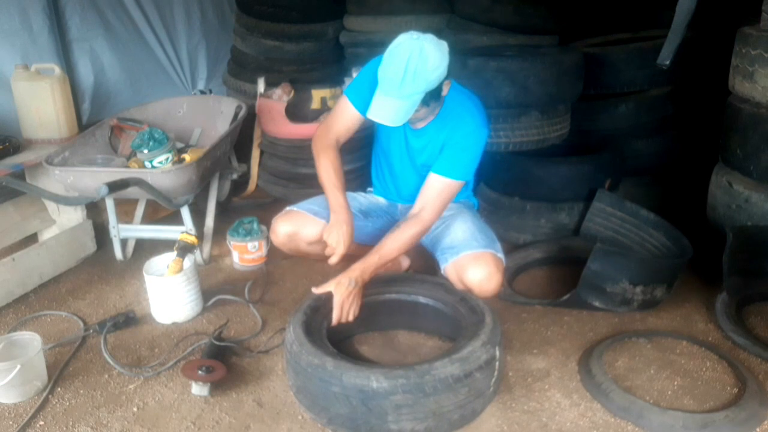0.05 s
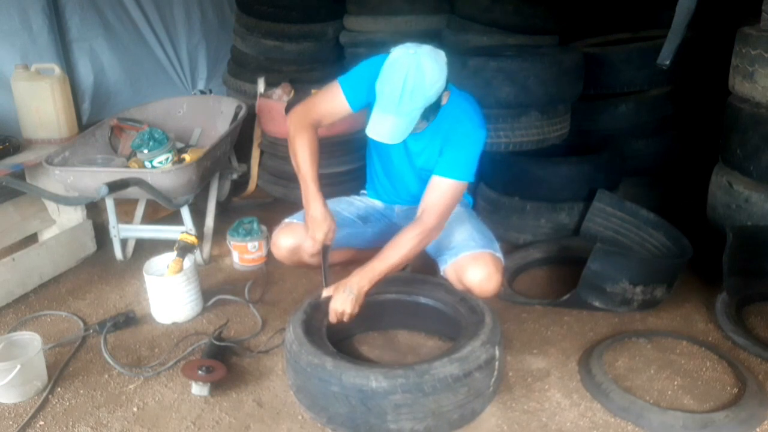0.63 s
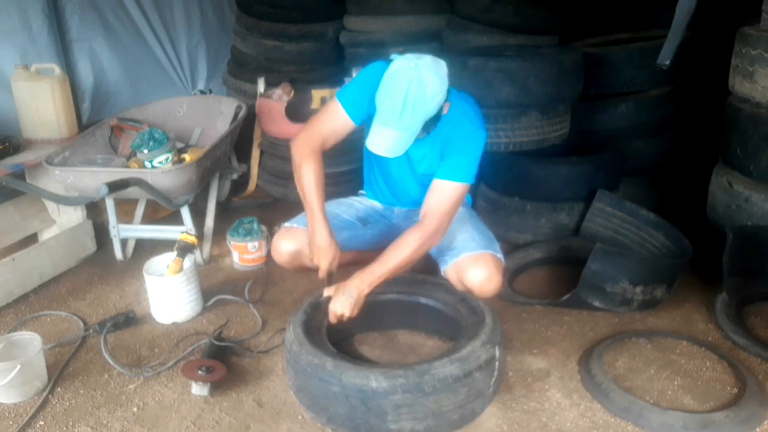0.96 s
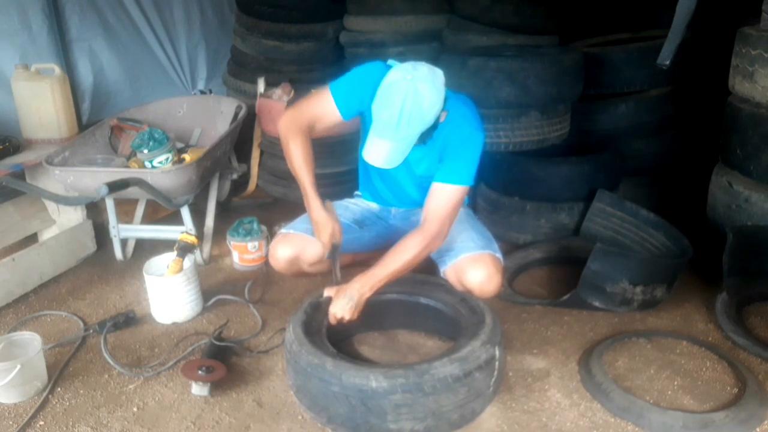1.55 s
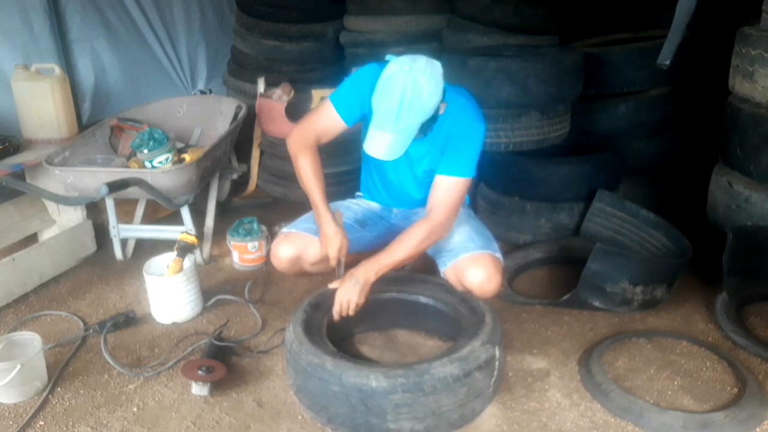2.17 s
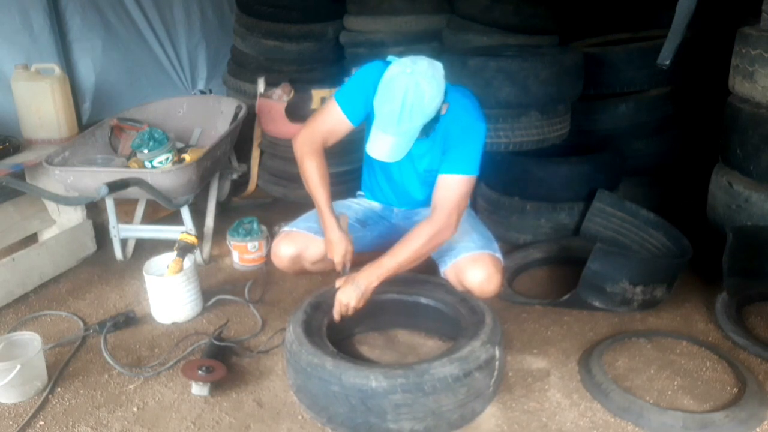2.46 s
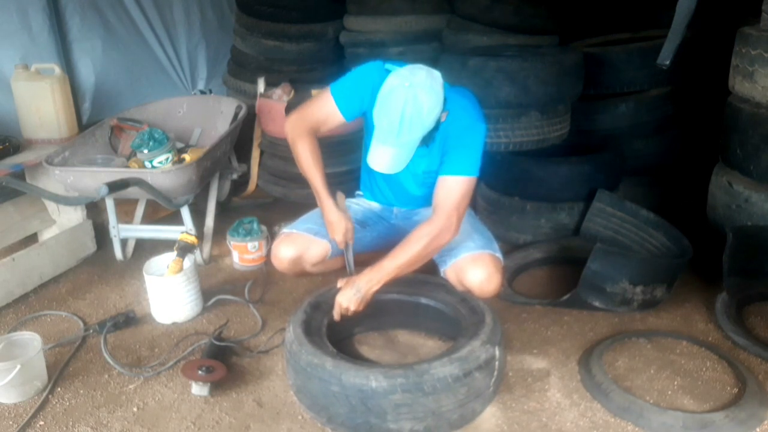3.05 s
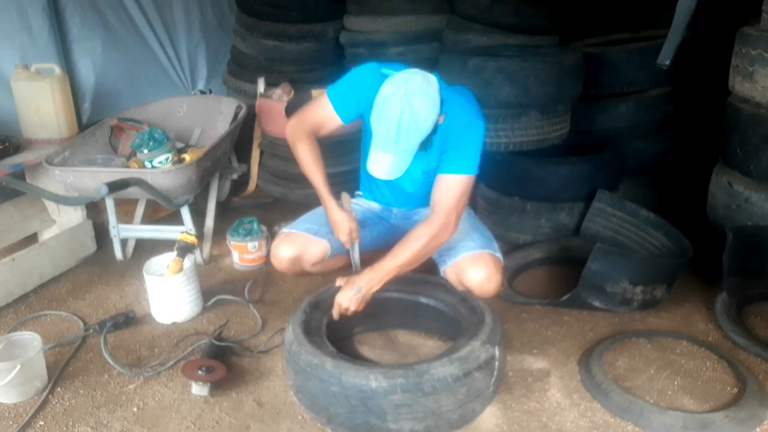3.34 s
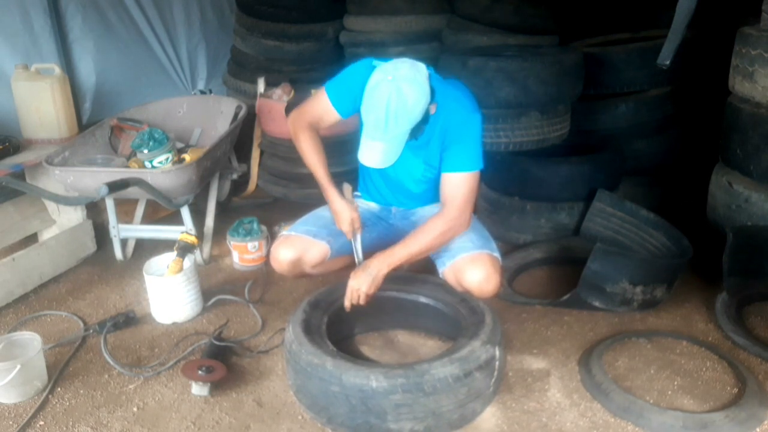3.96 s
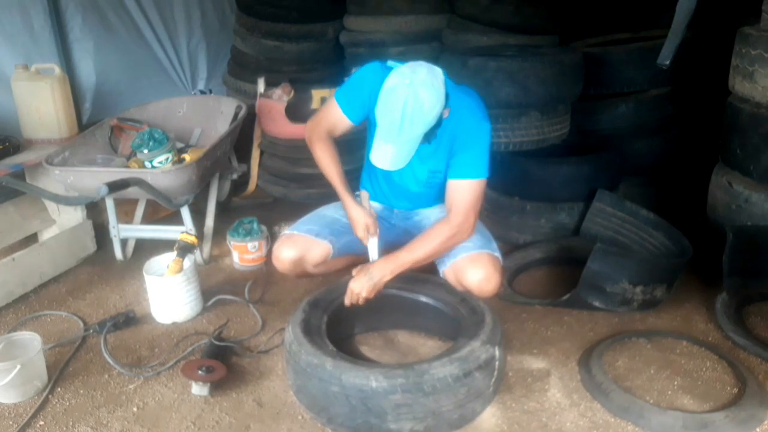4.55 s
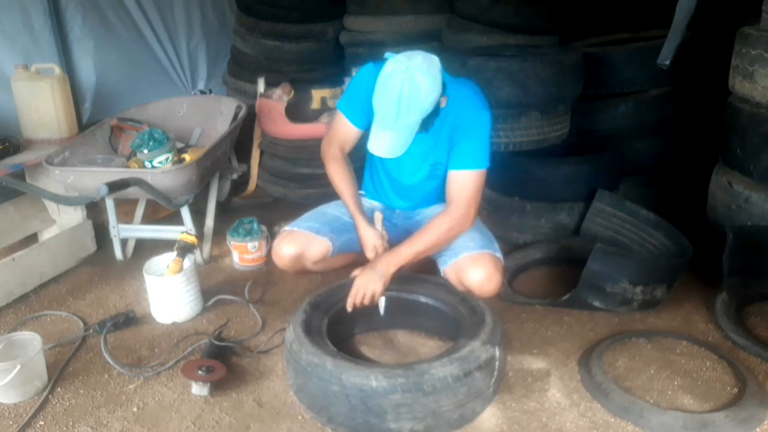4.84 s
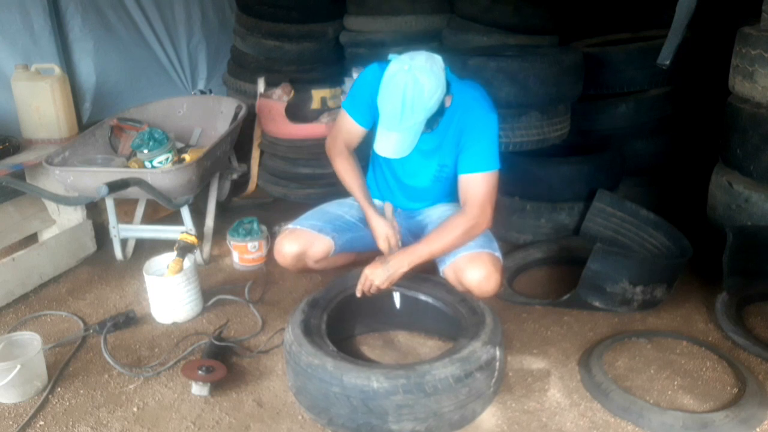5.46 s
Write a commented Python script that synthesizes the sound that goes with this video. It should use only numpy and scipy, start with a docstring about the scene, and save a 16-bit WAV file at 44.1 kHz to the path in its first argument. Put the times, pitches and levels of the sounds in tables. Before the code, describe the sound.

A knife saws through the thick rubber of a car tyre in short, uneven strokes, several a second. Each stroke mixes a hollow drumming from the tyre with a gritty rasp and a tearing hiss. The blade squeaks briefly, ticks, whistles thinly and now and then snags with a dull knock. The sawing pauses briefly a few times and resumes. It is heard from a few metres away in a shed, over a faint low rumble.

```python
"""Sawing a tyre with a knife

A man saws the sidewall out of a car tyre with a long knife, in a shed, a few metres away.
On each stroke the rubber sticks and slips on the edge: the slips drum the carcass, rasp along the
blade and tear with a hiss. Where the stroke turns, the flat of the blade squeaks in the cut.
The steel also ticks, snags and whistles thinly, over a faint low rumble."""
import sys
import numpy as np
from scipy import signal
from scipy.fft import rfft, irfft, next_fast_len
from scipy.io import wavfile
from scipy.ndimage import uniform_filter1d, map_coordinates

SR = 44100
rng = np.random.default_rng(int(sys.argv[2]) if len(sys.argv) > 2 else 0)


def wav_record(signal):
    """Record a signal, one row per channel, as 16-bit PCM in the file named by sys.argv[1]."""
    frames = np.transpose(np.atleast_2d(signal))
    bounded = np.clip(frames, -1, 1)
    # unit amplitude maps onto the largest positive 16-bit level
    quanta = np.round(bounded * 32767).astype(np.int16)
    wavfile.write(sys.argv[1], SR, quanta)


N = 251811
TIME = np.arange(N) / SR
FFT_SIZE = next_fast_len(N + SR // 2, True)
FREQ = np.fft.rfftfreq(FFT_SIZE, 1 / SR)
TOP_HZ = 15480

# modes of the tyre carcass and its air ring: pitch_hz, width_hz, gain_db
TYRE_MODES = [(117, 11.4, -8), (154, 18, -2), (189.5, 19, -1), (208, 15.6, 4.5), (225, 29, -3.5),
              (284, 33, -3.5), (427.7, 27, 6), (454, 44, 1.5), (490.5, 30, -1.5), (616, 19.5, 1.5),
              (649.3, 13.3, -1.5), (763, 17.5, -3), (846, 17.5, -3), (892, 28, -2), (1027, 31, 0),
              (1077, 50, -2), (1112.5, 20, 0), (1185, 15.2, 6), (1247, 9.8, 1), (1322, 24, -5.5),
              (1494, 18, -9.5)]
# bending modes of the blade: pitch_hz, width_hz, gain_db
BLADE_MODES = [(2098, 47, 6.5), (2506, 90, 8.5), (2707, 200, 0), (3020, 200, 11.5), (3930, 390, -1),
               (4520, 67, 5.5)]
# spectra of the rubber, the rasp, the tearing and the air in the shed: frequency_hz, gain_db
RUBBER_SPECTRUM = [(50, -16), (110, -19.5), (200, 9), (350, -18), (600, 2), (1200, -9), (1600, -7),
                   (2400, -13)]
RASP_SPECTRUM = [(1100, -19), (1600, -3.5), (2200, -1.5), (3000, 2), (3700, -1.5), (4350, 6.5), (4950, 0.5),
                 (5550, 3), (6300, -8.5), (7500, -10)]
HISS_SPECTRUM = [(5200, -29), (6400, -9), (6950, -7.5), (7550, -9.5), (8100, -2), (8550, -1.5),
                 (9300, -7.5), (10500, -7), (11850, -2), (12800, -3.5), (14000, 0.5), (14600, -3.5),
                 (15300, 3.5), (16500, -28)]
AIR_SPECTRUM = [(20, -9), (32, -6), (45, -4.5), (75, 0.5), (120, 2.5), (200, -10), (300, -10), (1000, -17),
                (3000, -23.5), (4400, -16), (6300, -19), (7200, -16), (10500, -30), (15300, -22)]
# strokes, mostly a hard cut and a lighter return; the last three levels are relative to the carcass:
# start_s, length_s, carcass_db, swell_db, boom_db, rasp_db, hiss_db
ARM_STROKES = [(-0.02, 0.076, -50.5, -20, 0, 1.5, -2), (.225, 0.075, -77, -4, 14.5, 12.5, -2),
               (0.395, .07, -61, 5.5, -0.5, 0.5, -6), (0.5, 0.24, -71.5, 6, -5, 4, -3),
               (0.682, 0.17, -54, 11.5, -10.5, -6.5, -2.5), (0.861, 0.097, -45.5, 6.5, -0.5, -6, 0),
               (1.022, 0.091, -49.5, 3.5, 1, -5, -4), (1.109, 0.082, -56.5, 3, -5, -3, -0.5),
               (1.267, 0.16, -44.5, 7.5, -4, -11, -2.5), (1.512, 0.14, -49, -7.5, 4, -5.5, -5),
               (1.726, 0.13, -46, 3.5, -1, -10.5, 3), (1.883, 0.058, -48, 3, -1, -11, -30),
               (2.196, .17, -56.5, 0.5, -9, -13.5, -4), (2.411, .135, -48, 7, -4.5, -4, -10.5),
               (2.582, 0.14, -54.5, -4, 3, 1.5, -4.5), (2.756, 0.12, -47.5, 0, -9, -7, -10),
               (2.934, 0.13, -58.5, 5, -4.5, 2.5, 0.5), (3.1, 0.14, -43.5, 7.5, -8.5, -8.5, -6.5),
               (3.29, 0.096, -47.5, -4, -4, -3, -8.5), (3.451, 0.09, -44, 4, -8, -6.5, -2.5),
               (3.81, 0.2, -59.5, 4.5, -19.5, -13.5, -8), (4.02, 0.17, -48, 8.5, -12, -3.5, -10.5),
               (4.22, 0.12, -53, -3, 0, -1, -4.5), (4.373, .104, -47.5, 10, -8.5, -3.5, -9),
               (4.509, 0.1, -52, -2.5, -1.5, -4, -5.5), (4.648, .11, -44, 9.5, -3, -4.5, -8.5),
               (5.054, .135, -66.5, 6, -2, 1, 2.5), (5.209, .123, -43, 4.5, 0, -0.5, -10),
               (5.369, 0.079, -50.5, 0, -1.5, -1, -4.5), (5.49, 0.09, -44, 6.5, -3, -1, -10),
               (5.622, 0.068, -51.5, -2, -5, 1.5, -4)]
# ring of the blade within the rasp, damped when buried and freer as it sticks out: time_s, gain_db
BLADE_RINGING = [(0, 8.5), (.95, -15), (1.85, -10), (2.55, -3), (3.3, -4.5), (5.3, 5), (5.7, 3)]
# treble of the tearing hiss: time_s, gain_db
HISS_TREBLE = [(0, -8), (.6, -11), (.95, -8.5), (1.4, -9.5), (1.85, 0), (2.15, -30), (2.55, -4), (3.2, -2),
               (3.55, -13), (4.75, -7), (5.7, -10)]
# swell of the low rumble, strongest as the tyre rocks: time_s, gain_db
RUMBLE_SWELL = [(0, 0), (2.3, 0), (3.9, 0.5), (4.7, 2), (4.95, 5.5), (5.2, 3), (5.7, 5)]
# squeaks of the blade in the cut: start_s, length_s, first_hz, last_hz, level_db
BLADE_SQUEAKS = [(.011, 0.055, 2634, 1734, -59), (0.468, 0.018, 9200, 7720, -53.5),
                 (0.736, 0.043, 6200, 8500, -55), (0.819, 0.1, 10600, 11800, -61),
                 (1.129, 0.05, 13900, 15600, -40.5), (1.145, 0.028, 12100, 13000, -43.5),
                 (1.279, .019, 5600, 5300, -53), (1.288, .013, 8700, 8350, -41.5),
                 (1.31, 0.0444, 7200, 7740, -54), (1.439, 0.023, 4100, 3530, -52),
                 (1.738, 0.016, 4270, 4750, -52), (1.864, 0.019, 4280, 3720, -51.5),
                 (2.236, 0.023, 15200, 14600, -57), (2.36, .018, 14800, 13400, -55),
                 (3.018, 0.026, 14300, 8930, -43), (3.032, 0.017, 9000, 6410, -37),
                 (3.036, .02, 14600, 13700, -41), (3.039, .016, 6850, 8240, -41),
                 (3.057, 0.017, 5520, 2030, -48), (3.125, .04, 11100, 14300, -52),
                 (3.472, .013, 6300, 5900, -51), (3.547, 0.032, 5540, 3730, -50),
                 (3.562, 0.015, 2895, 2230, -51.5), (4, 0.015, 13600, 6900, -52),
                 (4.007, 0.0101, 4240, 5540, -45.5), (5.161, 0.013, 14860, 12570, -42)]
# the steel touches or frees itself: start_s, strength_db
STEEL_TICKS = [(0.015, -49), (.238, -50.5), (0.435, -62), (.561, -55), (.639, -54), (.699, -48.5),
               (1.528, -43), (1.892, -39.5), (1.968, -45), (2.596, -54), (2.785, -46), (5.164, -44.5),
               (5.646, -39.5)]
# the edge snags and lets go: start_s, peak_db, cutoff_hz
EDGE_SNAGS = [(0.049, -47, 199), (.291, -55.5, 150), (0.406, -46, 890), (.888, -32, 890), (1.412, -38, 400),
              (1.528, -37.5, 706), (1.565, -38, 198), (1.77, -35.5, 494), (2.786, -47, 900),
              (3.835, -49.5, 400), (4.049, -34.5, 1810), (4.724, -42, 304), (4.853, -51.5, 250),
              (5.321, -33, 300), (5.646, -40.5, 700)]
# the blade is eased along the slit:
# start_s, length_s, first_hz, last_hz, glide_exponent, level_db, swell_db
SLIT_WHISTLES = [(1.061, 0.29, 5550, 5630, 1.47, -62, -17), (1.07, 0.25, 4330, 4310, 1.35, -68, 9),
                 (2.04, 0.3, 8410, 6500, 2.5, -69, 14), (2.021, 0.46, 3050, 4160, 0.54, -72.5, 15),
                 (2.188, 0.26, 5160, 5700, 0.66, -67, 4), (3.873, 0.56, 3990, 4100, 1.05, -63.5, 3)]


def undb(db):
    """Amplitude ratio of a level in decibels."""
    return 10 ** (np.asarray(db) / 20)


def unit(x):
    """Normalisation to rms 1."""
    return x / np.sqrt(np.mean(x ** 2))


def curve(points):
    """Linear interpolation of (time_s, value) points."""
    return np.interp(TIME, *np.transpose(points))


def through(x, response):
    """Linear filtering: the spectrum is multiplied by a frequency response."""
    return irfft(rfft(x, FFT_SIZE) * response, FFT_SIZE)[:N]


def colour(points, skirt_db_per_octave=24):
    """Spectral envelope through (frequency_hz, gain_db) points, falling steeply outside them."""
    hz, db = np.transpose(points)
    octave, knots = np.log2(FREQ + 1), np.log2(hz)
    outside = np.abs(octave - np.clip(octave, knots[0], knots[-1]))
    return undb(np.interp(octave, knots, db) - skirt_db_per_octave * outside)


def modes(table):
    """Modal superposition: damped resonances add, with neighbours in opposite polarity."""
    return sum((-1) ** k * undb(db) * 1j * FREQ * width / (hz ** 2 - FREQ ** 2 + 1j * FREQ * width)
               for k, (hz, width, db) in enumerate(table))


def below(hz):
    """Zero-phase low-pass response."""
    return 1 / (1 + (FREQ / hz) ** 8)


def wander(rate_hz, size):
    """Slow noise: linear interpolation between random values."""
    knots = rng.standard_normal(min(size, 8192))
    return 1.2 * np.interp(np.arange(size) * rate_hz / SR, np.arange(len(knots)), knots)


def add(track, start_s, sound):
    """Superposition of a sound on a track."""
    start = max(int(start_s * SR), 0)
    track[start:start + len(sound)] += sound[:N - start]


def slips(rate_hz, jitter, scatter_db):
    """Relaxation oscillation: each grip holds for its own time and lets go with its own size."""
    wait, size = rng.standard_normal((12000, 2)).T
    at = (np.cumsum(np.exp(jitter * wait)) * SR / rate_hz).astype(int)
    strength = undb(scatter_db * np.clip(size, -2, 2))
    return np.bincount(at[at < N], strength[at < N], N)


def roam(x, depth_db, rate_hz, bands=24):
    """Moving excitation: as the contact shifts, neighbouring bands take turns to sound."""
    hz, time_s, frames = signal.stft(x, SR, nperseg=512)
    band = np.log1p(hz / 1500) / np.log1p(TOP_HZ / 1500) * bands
    grid = np.meshgrid(band, time_s * rate_hz, indexing="ij")
    sway = map_coordinates(rng.standard_normal((40, 600)), grid, order=1, mode="mirror")
    _, swayed = signal.istft(frames * undb(depth_db * sway), SR)
    return unit(swayed[:N])


def steady(x, window_s):
    """Division by the running rms evens out friction, so that the arm sets its level."""
    size = int(window_s * SR)
    power = uniform_filter1d(uniform_filter1d(x ** 2, size), size)
    return x / np.sqrt(power + 1e-12)


def effort(layer_db, attack_s=0.05, release_db_per_s=249):
    """Amplitude envelope: each stroke speeds up, swells or sags, then dies away; their powers add."""
    power = np.zeros(N)
    for (start_s, length_s, carcass_db, swell_db, *_), offset_db in zip(ARM_STROKES, layer_db):
        time = TIME[:SR] + max(-start_s, 0)
        attack = np.sin(np.pi / 2 * np.minimum(time / attack_s, 1)) ** 2
        hold_db = swell_db * (np.minimum(time / length_s, 1) - .5)
        release_db = release_db_per_s * np.maximum(time - length_s, 0)
        add(power, start_s, (attack * undb(carcass_db + offset_db + hold_db - release_db)) ** 2)
    return np.sqrt(power)


def friction(burst_s=0.0022):
    """Stick-slip friction: coarse slips push the rubber, and each frees a burst of fine tearing."""
    coarse = slips(rate_hz=230, jitter=.42, scatter_db=2)
    bursts = unit(signal.lfilter([1], [1, -np.exp(-1 / (burst_s * SR))], coarse))
    tearing = roam(rng.standard_normal(N) * (bursts + .9), depth_db=3.6, rate_hz=26)
    push = roam(coarse - coarse.mean(), depth_db=2, rate_hz=12) + 0.44 * tearing
    return push, tearing


def drumming(push, tyre, boom_db):
    """Forced vibration: the slips drive a low boom in the sidewall and higher modes in the carcass."""
    lows = below(251)
    boom = steady(through(push, tyre * lows), window_s=0.026)
    boom *= effort(boom_db, attack_s=0.073, release_db_per_s=237)
    carcass = steady(through(push, tyre * (1 - lows)), window_s=0.1)
    carcass *= effort(np.zeros(len(ARM_STROKES)), release_db_per_s=278)
    return boom + carcass


def rasp(push, tearing, rasp_db):
    """Resonance: broadband friction at the edge excites the bending modes of the blade."""
    force = tearing + 0.17 * push
    scrape = unit(through(force, colour(RASP_SPECTRUM)))
    ring = undb(curve(BLADE_RINGING)) * unit(through(force, modes(BLADE_MODES)))
    return steady(scrape + ring, window_s=0.018) * effort(rasp_db)


def hiss(tearing, hiss_db):
    """Fracture noise: fresh rubber tears brighter than a slit that is only rubbed."""
    noise = through(tearing, colour(HISS_SPECTRUM))
    dull = through(noise, below(7700))
    treble = undb(curve(HISS_TREBLE)) * (noise - dull)
    return steady(dull + treble, window_s=0.079) * effort(hiss_db)


def background(level_db=-64.5, sway_db=1.5):
    """Ambient noise: a faint low rumble, slowly modulated in amplitude, under an even hiss."""
    air = through(rng.standard_normal(N), colour(AIR_SPECTRUM))
    rumble = through(air, below(180))
    swell = undb(curve(RUMBLE_SWELL) + sway_db * wander(4.9, N))
    return undb(level_db) * (air + rumble * (swell - 1)) / air.std()


def shed_echoes(x, t60_s=0.18, gap_s=0.0036):
    """Reverberation: reflections from the floor, walls and stacked tyres decay exponentially."""
    time = TIME[:SR // 2]
    tail = rng.standard_normal(len(time)) * undb(-60 * time / t60_s) * (time > gap_s)
    return through(x, rfft(tail / np.sqrt(np.sum(tail ** 2)), FFT_SIZE))


def squeaks(width_hz=850, flutter_db=5.5):
    """Self-excited oscillation: very fast stick-slip makes a gritty tone that glides with blade speed."""
    out = np.zeros(N)
    for start_s, length_s, first_hz, last_hz, level_db in BLADE_SQUEAKS:
        size = int(length_s * SR)
        hz = np.geomspace(first_hz, last_hz, size)
        # uneven grips spread the tone into a band
        spread = wander(width_hz * 1.5, size) + 1j * wander(width_hz * 1.5, size)
        swing = (1 + 2 * spread) * undb(flutter_db * wander(440, size))
        swing /= np.sqrt(1 + np.abs(swing / 2) ** 2)  # the rubber's grip caps the swing
        phase = 2 * np.pi * np.cumsum(hz + .35 * width_hz * wander(3500, size)) / SR
        tone = np.real(swing * np.exp(1j * phase)) * signal.windows.tukey(size, .5)
        highpass = signal.butter(4, .75 * hz.min(), "high", fs=SR, output="sos")
        add(out, start_s, undb(level_db) * unit(signal.sosfilt(highpass, tone)))
    return out


def ticks(decay_s=0.0042):
    """Contact transients: the steel touches or frees itself with a dry, fast-decaying noise burst."""
    out, fade = np.zeros(N), np.exp(-TIME[:2000] / decay_s)
    for start_s, strength_db in STEEL_TICKS:
        add(out, start_s, undb(strength_db) * fade * rng.standard_normal(len(fade)))
    return through(out, colour(RASP_SPECTRUM) + undb(-9) * colour(HISS_SPECTRUM))


def snags(tyre):
    """Impulse response: each snag jolts the tyre into ringing; a soft jolt only booms."""
    out, ring = np.zeros(N), irfft(tyre)[:6000]
    for start_s, peak_db, cutoff_hz in EDGE_SNAGS:
        jolt = signal.sosfilt(signal.butter(2, cutoff_hz, fs=SR, output="sos"), ring)
        add(out, start_s, undb(peak_db) * jolt / np.abs(jolt).max())
    return out


def whistles(waver_hz=160, flutter_db=5, fade_share=0.19):
    """Friction-induced vibration: the sliding blade sings in faint, wavering glides."""
    out = np.zeros(N)
    for start_s, length_s, first_hz, last_hz, glide_exponent, level_db, swell_db in SLIT_WHISTLES:
        size = int(length_s * SR)
        travel = np.linspace(0, 1, size)
        hz = first_hz + (last_hz - first_hz) * travel ** glide_exponent
        phase = 2 * np.pi * np.cumsum(hz + waver_hz * wander(1500, size)) / SR
        tone = unit(np.sin(phase) * undb(flutter_db * wander(159, size)))
        envelope = signal.windows.tukey(size, fade_share) * undb(level_db + swell_db * (travel - .5))
        add(out, start_s, tone * envelope)
    return out


def scene():
    """Superposition of knife, tyre and shed, the same in both channels."""
    tyre = modes(TYRE_MODES) + undb(-10) * colour(RUBBER_SPECTRUM)
    boom_db, rasp_db, hiss_db = np.transpose(ARM_STROKES)[-3:]
    push, tearing = friction()
    body = drumming(push, tyre, boom_db)
    edge = rasp(push, tearing, rasp_db) + hiss(tearing, hiss_db)
    squeaking, ticking, whistling = squeaks(), ticks(), whistles()
    # only the bright sounds of the blade are given echoes; the tyre's ring stays dry
    bright = undb(-7.5) * edge + undb(1.5) * squeaking + undb(2) * ticking + undb(-1.5) * whistling
    direct = body + edge + squeaking + ticking + snags(tyre) + whistling
    mono = direct + shed_echoes(bright) + background()
    return np.array([mono, mono])


def record(dry):
    """Band limiting: an elliptic low-pass cuts the top steeply."""
    return signal.sosfilt(signal.ellip(12, .1, 80, TOP_HZ, fs=SR, output="sos"), dry)


dry = scene()
out = record(dry)
wav_record(out)
```